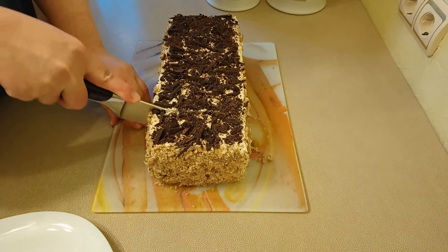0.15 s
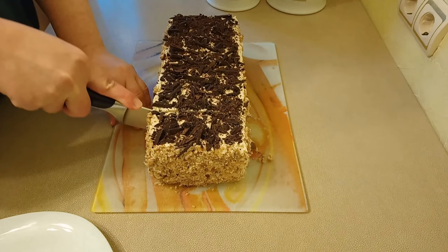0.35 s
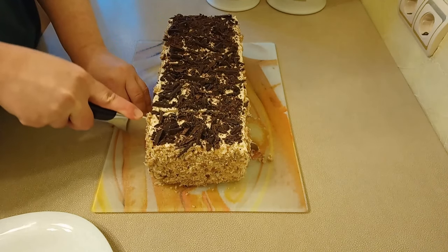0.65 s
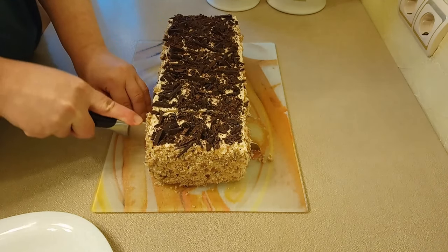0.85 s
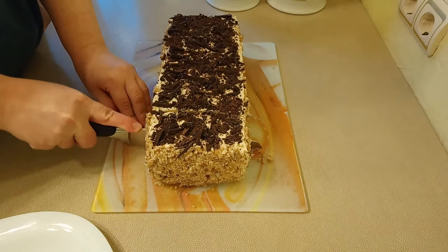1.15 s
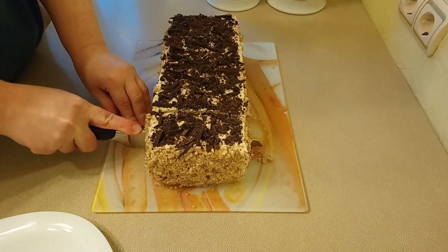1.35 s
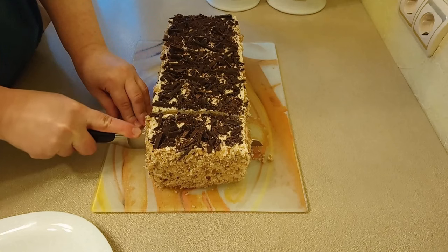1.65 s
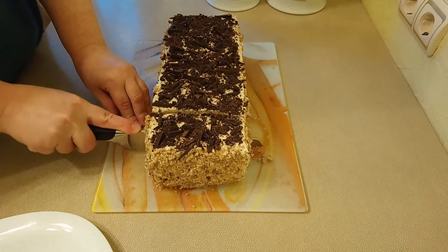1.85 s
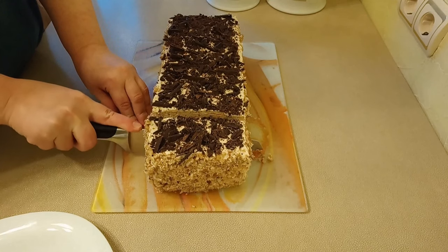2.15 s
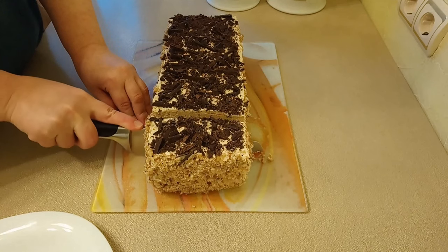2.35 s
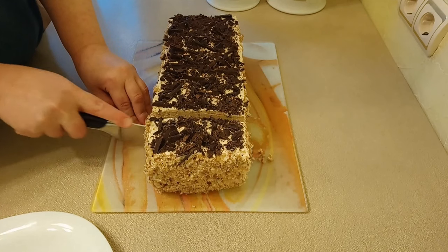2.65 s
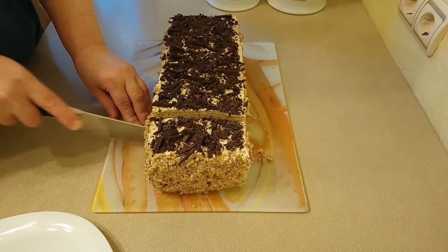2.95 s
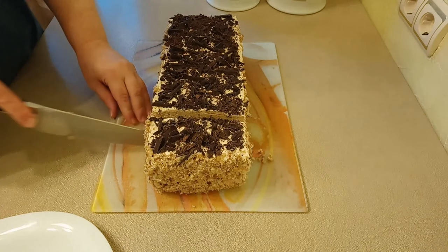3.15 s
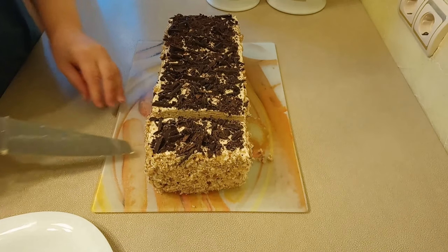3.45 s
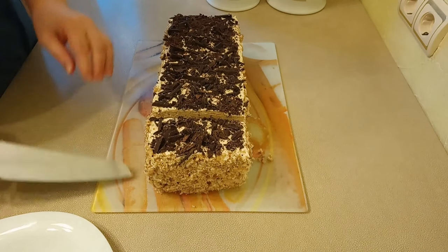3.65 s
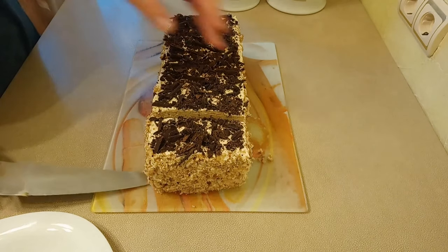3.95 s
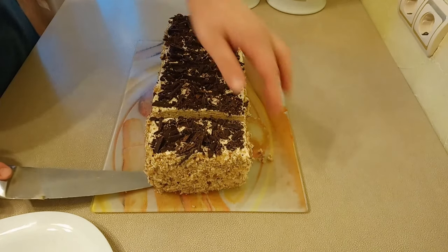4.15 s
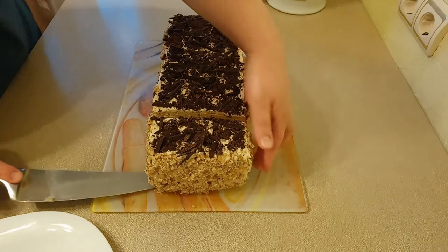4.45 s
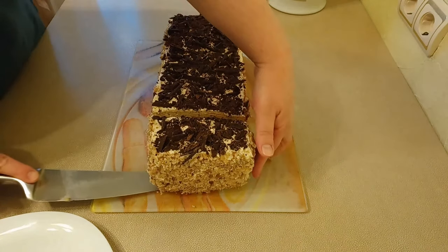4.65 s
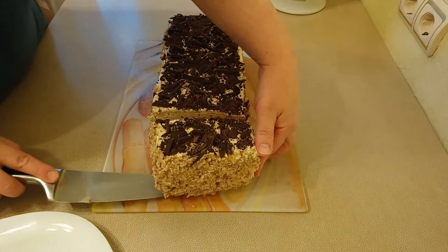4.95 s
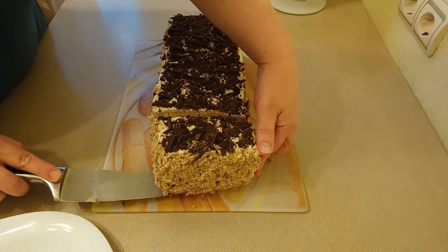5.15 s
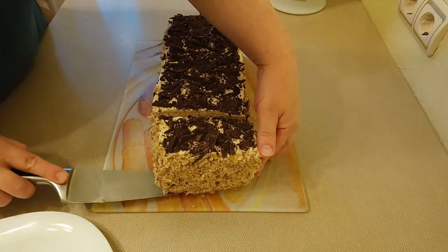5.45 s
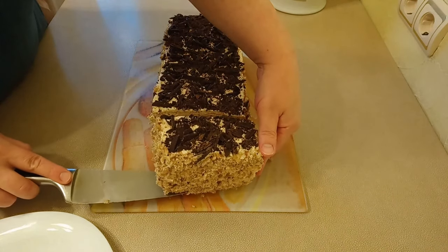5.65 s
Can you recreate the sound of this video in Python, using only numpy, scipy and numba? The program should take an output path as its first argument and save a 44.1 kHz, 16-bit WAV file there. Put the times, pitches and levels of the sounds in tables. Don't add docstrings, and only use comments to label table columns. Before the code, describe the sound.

Close phone pickup in a small hard kitchen, in stereo. Cake crust crackles and a knock sounds, then the knife hits glass and grinds in short gritty strokes, building to a longer rough draw. After a pause the blade tip taps and rings metallically with a brief squeal, knocks once sharply, then scrapes quietly under the slice. Low appliance hum and hiss remain.

```python
import sys
import numpy as np
from scipy import signal
from scipy.fft import rfft, irfft
from scipy.io import wavfile
from scipy.ndimage import uniform_filter1d
from numba import njit

SR = 44100
rng = np.random.default_rng(int(sys.argv[2]) if len(sys.argv) > 2 else 0)


def int16_out(signal):
    q = np.round(np.clip(np.atleast_2d(signal).T, -1, 1) * 32767)
    wavfile.write(sys.argv[1], SR, q.astype(np.int16))


def magnitude_from_level(level_db):
    exponent = np.asarray(level_db, float) / 20
    return 10 ** exponent


N = 255701
T = np.arange(N) / SR


def shape(x, table, scale=0.93):
    hz, db = np.transpose(table)
    bins = np.log(np.arange(x.shape[-1] // 2 + 1) * SR / x.shape[-1] + 1)
    return irfft(rfft(x) * magnitude_from_level(scale * np.interp(bins, np.log(hz), db)), x.shape[-1])


def unit(x):
    return x / np.sqrt(np.mean(x ** 2))


@njit
def resonate(x, hz, width):
    y, band, low = np.empty(len(x)), 0., 0.
    for i in range(len(x)):
        g, k = np.tan(np.pi * hz[i] / SR), width / hz[i]
        v = (band + g * (x[i] - low)) / (1 + g * (g + k))
        band, low, y[i] = 2 * v - band, low + 2 * g * v, k * v
    return y


def walk(rate_hz):
    k = int(SR / rate_hz)
    return 1.116 * uniform_filter1d(np.repeat(rng.standard_normal(N // k + 1), k), k)[:N]


# hz, density_db (per Hz)
AIR = [(12, -51.5), (20, -20.5), (146, -5.5), (187, -5.5), (216, -10.5), (241, -12), (357, -17.5),
       (485, -17.5), (1480, -24), (6360, -25), (7520, -38), (8650, -35.5), (12400, -39.5), (14700, -32),
       (16000, -21)]
# hz, common_share
AIR_LIKENESS = [(30, 0.43), (130, 0.76), (300, 0.24), (1000, 0.13), (3000, 0.033)]
AIR_DB = -69.5


def air():
    common, left, right = rng.standard_normal((3, N))
    likeness = [(hz, np.clip(share, .001, .999)) for hz, share in AIR_LIKENESS]
    shared = [(hz, 10 * np.log10(share)) for hz, share in likeness]
    own = [(hz, 10 * np.log10(1 - share)) for hz, share in likeness]
    hiss = shape(shape(common, shared) + shape(np.array([left, right]), own), AIR)
    return magnitude_from_level(AIR_DB) * hiss / np.std(shape(hiss, [(249, -80), (250, 0)]))


# start_s, hum_level_db
HUM = [(0.0, -97), (0.11, -83), (0.63, -68), (1.24, -86), (1.32, -72.5), (1.7, -79.5), (1.78, -68),
       (1.94, -75), (2.76, -54.5), (3.71, -71), (3.89, -55.5), (4.02, -65.5), (4.26, -53), (4.41, -90),
       (4.49, -66.5), (5.42, -80), (5.49, -66.5), (5.8, -72)]
# pitch_hz, width_hz, level_db, share_of_hum_swing, own_wander_db
HUM_MODES = [(130.7, 4.1, -9.5, .3, 6.5), (167.7, 11, -8, 0.53, 7.5), (194.6, 7.8, 0.5, 0.92, -2)]
HUM_MEAN_DB = -71.5


def hum():
    swing_db = np.interp(T, *np.transpose(HUM)) - HUM_MEAN_DB
    out = 0
    for hz, width, db, share, wander_db in HUM_MODES:
        centre = np.full(N, 1. * hz)
        mid, side = (unit(resonate(resonate(rng.standard_normal(N), centre, 1. * width), centre, 3.2 * width))
                     for _ in range(2))
        level = magnitude_from_level(HUM_MEAN_DB + db + share * swing_db + wander_db * walk(4.2))
        out = out + level * (mid + 0.17 * side * np.array([[1], [-1]]))
    return out


# pitch_hz, level_db, start_s, end_s
WHINE = [
    (5200, -89.5, 3.5, 6.9),
    (6066, -90.5, -0.5, 2.8),
    (6100, -87, 5, 5.35),
    (6480, -87.5, 1, 1.52),
    (6490, -86, 1.5, 6.15),
    (7390, -91.5, -1, 7.1),
]
WHINE_FADE_S = 0.42


def whine():
    out = 0
    for hz, db, start, end in WHINE:
        phase = 2 * np.pi * np.cumsum(hz + 1.2 * walk(7.8)) / SR + rng.uniform(0, 2 * np.pi, (2, 1))
        running = np.clip(np.minimum(T - start, end - T) / WHINE_FADE_S, 0, 1)
        out = out + running * magnitude_from_level(db + 7.5 + 3.4 * walk(8)) * np.sin(phase)
    return out


# hz, t60_s
ROOM = [(100, 0.2), (500, 0.33), (2000, 0.28), (6000, 0.21), (12000, 0.11)]


def kitchen(x):
    t, tail = T[:SR // 2], 0
    room_hz, room_t60 = np.transpose(ROOM)
    for hz in 90 * 2. ** np.arange(8):
        t60 = np.interp(np.log(hz), np.log(room_hz), room_t60)
        own = min(hz / 1300, 1) * rng.standard_normal((2, len(t)))
        common = max(1 - hz / 1300, 0) * rng.standard_normal(len(t))
        octave = [(hz / 2, -60), (hz / 2 ** .5, -3), (hz, 0), (hz * 2 ** .5, -3), (hz * 2, -60)]
        band = shape(unit(own + common), octave)
        tail = tail + band * np.exp(-np.log(1000) * t / t60) * np.clip(t / 0.0079, 0, 1)
    fine, broad = (uniform_filter1d(np.abs(rfft(tail)), size=k) for k in (7, 300))
    tail = irfft(rfft(tail) * broad / fine)[:, :SR * 2 // 5]
    return signal.fftconvolve(x[1:], tail / np.sqrt(np.sum(tail ** 2) / 2), axes=1)[:, :N]


# hz, level_db
ECHO_FEED = [(700, 0.5), (900, -5.5), (1050, -12.5), (1250, -5.5), (1600, 0.5)]
# hz, level_db
ECHO_SHADE = [(5500, 1), (7000, -5), (8000, -18.5), (10000, -13.5), (14000, -12)]


def echo(knife):
    left, right = kitchen(shape(knife, ECHO_FEED))
    return magnitude_from_level(-6.0) * np.array([shape(left, ECHO_SHADE), right])


def grit(scatter_db, patchy_db, patch_hz):
    grains = rng.standard_normal(N) * magnitude_from_level(scatter_db * rng.exponential(size=N))
    return unit(grains * magnitude_from_level(patchy_db * walk(patch_hz)))


RISE_DB_S, FALL_DB_S = 1202, 332


def push(rows, rise=RISE_DB_S, fall=FALL_DB_S, depth=40):
    return [[(s - depth / rise, db - depth, *tone),
             (s, db, *tone),
             (s + abs(hold) + 1e-4, db, *tone),
             (s + abs(hold) + depth / fall, db - depth, *tone)] for s, hold, db, *tone in rows]


def catches(rows):
    return [(*row, 0.0042) for row in rows]


LEFT_LAG = 11


def small_modes(dense):
    swarm = rng.standard_normal((2, 900)) + 0.12 * rng.standard_normal(900)
    swarm = swarm * np.exp(-T[:900] / 0.0028)
    swarm[:, 0] = 3.5
    swarm = irfft(rfft(swarm) / uniform_filter1d(np.abs(rfft(swarm)), size=9))
    swarm[0] = np.roll(swarm[0], LEFT_LAG)
    swarm = swarm / np.sqrt(np.sum(swarm ** 2) / 2)
    return signal.fftconvolve(dense[1:], swarm, axes=1)[:, :dense.shape[1]]


def contact(strokes, slips, modes, grains, slip_db, stretch=None, knock=3.2, drift=0.):
    drive, tilt = np.zeros(N), np.zeros(N)
    for s, db, *bright in map(np.transpose, strokes):
        now = (T >= s[0]) & (T < s[-1])
        gain = magnitude_from_level(np.interp(T[now], s, db))
        drive[now] += gain
        tilt[now] += gain * sum(b[0] for b in bright)
    force = drive * grains
    chatter = rng.choice([-1., 1.], N)
    for s, db, bright, burst in slips:
        at = int(s * SR)
        blow = magnitude_from_level(db + slip_db) * np.exp(-T[:3000] / max(burst, .0005))
        force[at:at + 3000] += blow * chatter[at:at + 3000]
        force[at] += knock * blow[0]
        drive[at:at + 3000] += blow
        tilt[at:at + 3000] += blow * bright
        drive[at], tilt[at] = blow[0], blow[0] * bright
    on = uniform_filter1d(1. * (drive > 0), 8820, origin=4000) > 0
    force = force[on]
    tilt = np.clip(tilt / (drive + 1e-9), -14, 14)[on]

    total = np.sqrt(sum(magnitude_from_level(2 * db) * np.pi * width / SR for _, width, db in modes))
    glide = np.interp(T[on], *np.transpose(stretch)) if stretch else np.ones(len(force))
    wobble = drift * walk(24.96)[:len(force)]
    clear, dense = np.zeros((2, 2, len(force)))
    for k, (hz, width, db) in enumerate(modes):
        coloured = force * magnitude_from_level(tilt * np.log2(max(hz, 1000) / 1500)) + 1e-18
        centre = hz * glide * (1 + np.roll(wobble, 1500 * k))
        ring = resonate(coloured, centre, max(width, 3.))
        lag = int(min(LEFT_LAG, .2 * SR / hz))
        bus = dense if width > 400 else clear
        bus += (-1) ** k * magnitude_from_level(db) * np.array([np.roll(ring, lag), ring]) / total
    out = np.zeros((2, N))
    out[:, on] = clear + small_modes(dense)
    return out


def spots(strokes, slips, modes, grains, slip_db, **how):
    out = 0
    for k in range(len(strokes)):
        here = [(mode[0], mode[1], mode[2 + k]) for mode in modes]
        out = out + contact(strokes[k], slips[k], here, grains, slip_db, **how)
    return out


# start_s, hold_s, level_db
LEAN = [
    (0.07, 0.037, -69.5),
    (.45, 0.073, -73.5),
    (.92, 0.035, -64.5),
    (2.07, 0.037, -70.5),
    (2.43, 0.057, -65),
    (3.3, 0.17, -70.5),
    (3.85, 0.11, -68),
]
# pitch_hz, width_hz, level_db
CABINET = [(88, 18, -6), (125.3, 22, 5.5)]


def leaning_hand():
    return contact(push(LEAN, 350, 250), [], CABINET, grit(1.5, 2.2, 27), 0)


# start_s, hold_s, level_db
THUD = [
    (0.05, 0.017, -81),
    (0.69, 0.062, -66),
    (1.786, 0.0015, -43),
    (2.04, .03, -69),
    (2.63, 0.476, -54),
    (3.78, 0.19, -74.5),
]
# pitch_hz, width_hz, level_db
WORKTOP = [(60, 80, -11.5), (131, 45, -0.5), (211.3, 45, 3), (268, 28, 3), (353, 35, -8.5)]


def worktop_thuds():
    return contact(push(THUD, 300, 500), [], WORKTOP, grit(0.92, 1.4, 40), 0) * magnitude_from_level(-3.0)


# start_s, peak_db, brightness_db_per_octave, burst_s
NUDGE = [
    (5.428, -52.5, -0.5, 0.022),
]
# pitch_hz, width_hz, level_db
NUDGED = [(776, 27, -1.5), (1244, 23, -1), (1726, 18, 4), (2950, 43, -10), (3560, 37, 1), (4863, 32, 0.5),
          (7320, 75, 1), (3000, 2600, -18), (2450, 68, -8)]


def nudge(grains):
    return contact([], NUDGE, NUDGED, grains, -5.0)


WEDGE_S, WEDGE_DB_S = 4.172, 56
WEDGE_BENDING_DB, WEDGE_PRESSED_DB = -55, -61


def wedge(db, *tone):
    return push([(WEDGE_S, 0, db, *tone)], WEDGE_DB_S, 3000, 20.1)


# start_s, hold_s, level_db, brightness_db_per_octave
UNDER = [
    (4.7, 0.037, -76, 9.5),
    (4.85, 0.0086, -60.5, 1.5),
    (5.0, 0.035, -73.5, -6.5),
]
# start_s, peak_db, brightness_db_per_octave
UNDER_SLIPS = [(4.655, -50, 1), (4.754, -68, 4), (4.799, -62, -14), (4.678, -49, -6), (4.776, -62, -2),
               (4.834, -43, 7.5), (4.849, -52, -15), (4.867, -44, 2), (4.879, -46, 1.5), (4.919, -40, 0),
               (4.934, -42.5, -2), (4.976, -50, 2), (5.011, -51, 5), (5.021, -44.5, -5), (5.071, -49, -11)]
# pitch_hz, width_hz, level_db
PRESSED = [(800, 45, -7.5), (998, 23, -4), (1325, 55, 5), (1387, 148, -1.5), (2495, 71, -3),
           (2800, 66, -7.5), (3020, 58, -8), (3640, 52, -6.5), (4300, 120, -8.5), (4750, 43, -34),
           (5340, 110, -14), (6500, 59, -15), (7660, 89, -7.5), (9320, 72, -1.5), (1480, 4500, -18),
           (4150, 12500, -16)]


def under_the_slice():
    strokes = push(UNDER, 52.4, 87, 25) + wedge(WEDGE_PRESSED_DB, 3.1)
    return contact(strokes, catches(UNDER_SLIPS), PRESSED, grit(2.25, 2.2, 60), -5.0, knock=2.7, drift=0.0081)


# start_s, hold_s, level_db
SQUEAL = [
    (3.842, 0.062, -45.5),
]
SQUEAL_HZ = 1221


def squeal():
    s, db = np.transpose(push(SQUEAL, 530, 266)[0])
    phase = 2 * np.pi * np.cumsum(SQUEAL_HZ + 3.4 * walk(60)) / SR
    level = magnitude_from_level(np.interp(T, s, db, -150, -150) + 3.5 + 2.1 * walk(83))
    return level * np.sin(phase - np.array([[1.1], [0]]))


# start_s, hold_s, level_db
SKATE = [
    (3.76, .002, -55),
    (3.845, 0.013, -56),
    (3.93, 0.22, -71.5),
]
# start_s, pitch_factor
SKATE_STRETCH = [(3.75, 0.96), (3.9, 0.99), (4.0, 1.02), (4.1, 1.075), (4.201, 1.06)]
# start_s, peak_db, brightness_db_per_octave, burst_s
SKATE_SLIPS = [
    (3.754, -29.5, 1, 0.0079),
    (3.766, -40.5, 5, 0.019),
    (3.799, -30.5, -2.5, 0.0092),
    (3.809, -28.5, 0, 0.015),
    (3.842, -40, 0.5, 0.044),
]
# pitch_hz, width_hz, level_db
BENDING = [(400.5, 15, -9), (765.5, 14, 1.5), (1134, 24, -9), (1683, 15, -3), (2330, 38, -16),
           (3910, 30, -14), (2820, 31, -16)]
GRIP_DB_S = 500


def skating_tip(grains):
    strokes = push(SKATE, 850, 133, 20) + wedge(WEDGE_BENDING_DB)
    grip_db = GRIP_DB_S * np.clip(T - WEDGE_S - .012, 0, .1)
    return contact(strokes, SKATE_SLIPS, BENDING, grains, -15.5, SKATE_STRETCH) * magnitude_from_level(-5.5 - grip_db)


# pitch_hz, width_hz, level_db
BLADE = [(704, 65, -5.5), (1216, 45, -3.5), (2860, 60, -4), (2473, 47, -6), (3010, 24, -14),
         (3520, 36, -1.5), (4300, 38, -3.5), (3920, 22, -1.5), (4660, 59, -9), (5150, 49, -13),
         (5500, 31, -0.5), (6490, 70, -3.5), (7600, 43, -11), (8760, 36, 2.5), (9500, 32, 2.5),
         (10800, 45, -8), (11640, 42, 5), (13000, 120, -14), (810, 760, -31), (2530, 5500, -15),
         (5150, 3500, -14.5), (10030, 9200, -9)]


def tapped_blade(grains):
    return contact([], SKATE_SLIPS, BLADE, grains, -1.8)


# start_s, hold_s, level_db, brightness_db_per_octave
CRUMB = [
    [(0.001, 0.02, -65.5, 8), (0.05, 0.0028, -47, 3)],
    [(.38, .07, -68, -5), (0.686, 0.0036, -44.5, 1.5), (0.8, 0.12, -57, 2), (1.0, 0.056, -63.5, 1.5)],
    [(4.176, 0.0018, -46, -5.5)],
    [(0.588, 0.06, -45.5, 0.5)],
]
# start_s, peak_db, brightness_db_per_octave, burst_s
CRACKS = [
    [(0.05, -38.5, 6.5, 0.0042)],
    [(.686, -26.5, 3, 0.0027), (.697, -31.5, -7, 0.0048), (.717, -44, -6, 0.0034), (.743, -47, -2, .004),
     (.8215, -57, -4, .003), (1.021, -52, -2, 0.0026)],
    [(4.183, -25, 1, 0.0009), (4.194, -50, -18, 0.0087)],
    [(0.589, -40, 5.5, 0.0089)],
]
# pitch_hz, width_hz, crust_db, first_knock_db, last_knock_db, sponge_db
CRUST = [(439, 43, -16.5, -7.5, -4, -24), (587, 32, 6, 1, -10, -20), (877, 160, -1.5, -27, 1, -18),
         (1270, 395, -18, 2, -3.5, -10), (1760, 360, -7, 2, -29, -3), (2330, 180, -28, -1.5, -11.5, -2.5),
         (3330, 160, -6, -3, -19, -9), (4820, 260, -30, -5.5, -10.5, -19), (1480, 1010, -9, -4, -7.5, -3.5),
         (3100, 6200, -6, -9.5, -9.5, -5.5), (5620, 2970, 0.5, -8, -11, -2.5),
         (9500, 3600, -0.5, -41, -28, -5), (15200, 1500, -9, -28.5, -28, -6),
         (1520, 126, -20, -1, -18, -11)]


def crumbs_and_knocks():
    strokes = [push(crumb, 5000, 225) for crumb in CRUMB]
    return spots(strokes, CRACKS, CRUST, grit(3.1, 3.7, 80), -0.62, drift=0.031) * magnitude_from_level(-5.5)


# pitch_hz, width_hz, then level_db at three spots
BOARD_MODES = [(341, 11, -20.5, -32, -18), (454, 17, -6.5, -25, -19), (578, 17, -3.5, -4.5, -8),
               (653, 88, -3.5, -2.5, -6.5), (762, 147, -6.5, -5, -10.5), (941, 54, 1, -2, -6),
               (996, 45.4, 7, 5, 7), (1102, 54, 2.5, 4, 1), (1200, 65, -12, -17.5, -7),
               (1276, 24, -21, -15.5, -6), (1406, 128, -16.5, -6.5, -5.5), (1561, 23, -8.5, -4.5, -3),
               (1780, 110, -31, -26, -18), (2353, 71, -19, -17.5, -12),
               (2870, 370, -33, -27, -15), (3212, 102, -14, -12.5, -11.5), (3270, 56, -16, -20, -27.5),
        (3790, 140, -16, -25.5, -27.5), (4260, 78, -31, -22.5, -18), (4775, 110, -21, -23.5, -18.5),
        (5630, 310, -23, -29, -26), (6490, 390, -26, -29.5, -37), (7700, 81, -41, -31.5, -33),
        (9690, 310, -22, -42, -31.5)]
# pitch_hz, width_hz, then level_db at three spots
CROWDS = [(612, 370, -11.5, -26.5, -34.5), (1310, 1570, -29.5, -16, -13), (2154, 630, -17.5, -29, -22.5),
          (3204, 820, -24, -35.5, -38.5), (5450, 4000, -24.5, -35.5, -25.5)]
DRAGGED = [-20, -22.5, -7.5, -10, -13, -4.5, 7, -4.5, -8.5, -4.5, -0.5, -6.5, -14, -18, -25.5, -7.5, -20,
           -30.5, -10.5, -15, -23, -34.5, -32.5, -24, -30.5, -11, -26.5, -30.5, -28.5]
LEAVING = [-26, -23.5, -10.5, -12.5, -10, -2.5, 5.5, 2, -6.5, -6.5, -2, -0.5, -11.5, -11, -23, -19, -31,
           -34, -5, -8.5, -24, -33, -20.5, -20, -24, -13.5, -28.5, -42, -25]
# pitch_hz, width_hz, then level_db at five spots
BETWEEN = [(825, 54, -6, -4.5, -12, -23.5, -10.5), (1703, 22, -16, -18, -10, -9.5, -13.5),
           (1993, 31, -18, -18.5, -10.5, -13.5, -19.5), (2660, 40, -26.5, -25, -11.5, -19, -18.5)]


def board():
    main = BOARD_MODES + CROWDS
    return [(*mode, dragged, leaving) for mode, dragged, leaving in zip(main, DRAGGED, LEAVING)] + BETWEEN


# start_s, hold_s, level_db, brightness_db_per_octave
CUT = [
    [(.5, 0.095, -71.5, 4), (0.592, 0.065, -56, -1), (1.69, .015, -61.5, -2), (1.718, 0.015, -38, 0),
     (1.78, 0.0015, -34.5, 8.5), (1.88, 0.19, -54.5, 0.5)],
    [(2.038, 0.043, -36.5, -4.5), (2.1, 0.054, -43, -2.5), (2.19, 0.049, -53.5, 2),
     (2.296, 0.026, -48.5, -2)],
    [(2.522, 0.011, -54.5, -8.5), (2.545, .03, -46, 0.5), (2.59, .07, -34.5, -0.5),
     (2.69, 0.084, -36, -0.5)],
    [(2.81, 0.13, -35.5, -0.5), (2.97, 0.026, -40, 5.5)],
    [(3.04, 0.041, -41, 4), (3.11, 0.0076, -49, 5.5)],
]
# start_s, peak_db, brightness_db_per_octave
CUT_SLIPS = [
    [(0.589, -49, 4), (1.697, -49, -0.5), (1.709, -38.5, 3), (1.714, -28.5, -6), (1.719, -29.5, 3),
     (1.725, -32.5, 2), (1.736, -46, 4), (1.776, -17.5, 1), (1.786, -24, -2), (1.795, -24, -3.5),
     (1.802, -23.5, 2.5), (1.815, -32, -1), (1.823, -39, -3), (1.836, -40, -4), (1.86, -45, -2)],
    [(1.998, -46.5, 3), (2.028, -33, -3), (2.035, -25, 1), (2.043, -31.5, -1.5), (2.055, -30, -1.5),
     (2.06, -24.5, -1.5), (2.077, -30.5, -0.5), (2.106, -27, -9), (2.119, -28, 6), (2.124, -27, -5),
     (2.133, -35, -6), (2.145, -44, -7.5), (2.163, -51, 2.5), (2.293, -46, -12.5), (2.301, -42.5, -12),
     (2.308, -41, -4.5)],
]
# start_s, peak_db, brightness_db_per_octave
DRAW_SLIPS = [
    [(2.53, -37.5, -13), (2.551, -42, 7.5), (2.565, -33, 2.5), (2.581, -28.5, -17.5), (2.589, -31, -13),
     (2.603, -27.5, -20), (2.613, -20, -8), (2.634, -24, -7), (2.65, -25.5, 1.5), (2.661, -23, -0.5),
     (2.672, -22.5, -3.5), (2.69, -25.5, -7.5), (2.701, -29, -1.5), (2.708, -19.5, -2.5),
     (2.714, -25.5, -2), (2.726, -22, 0.5), (2.735, -23, 1.5), (2.742, -20, -3), (2.753, -23, 0),
     (2.769, -27, 1), (2.78, -25, -1.5), (2.787, -30, 2), (2.798, -28.5, 4)],
    [(2.814, -24.5, -2), (2.828, -23.5, 1.5), (2.837, -30, -3), (2.842, -23, 1.5), (2.848, -28.5, -4),
     (2.861, -27, 2), (2.87, -22, -4.5), (2.885, -25.5, 6.5), (2.894, -20.5, 0), (2.903, -25.5, -8),
     (2.917, -25.5, 9), (2.926, -26.5, -6.5), (2.938, -24, 3), (2.95, -26, 2), (2.961, -25.5, 7.5),
     (2.972, -29, 5), (2.983, -37.5, 3), (3.006, -35, 0)],
    [(3.027, -24.5, 1), (3.037, -28.5, -2), (3.043, -26, 5.5), (3.054, -24, -3), (3.066, -21, 4.5),
     (3.078, -23.5, -8), (3.087, -25, -1.5), (3.095, -28, 4), (3.107, -31, -6), (3.123, -39, 5),
     (3.136, -41, 1.5)],
]


def cutting():
    strokes = [push(cut) for cut in CUT]
    slips = [catches(rows) for rows in CUT_SLIPS + DRAW_SLIPS]
    return spots(strokes, slips, board(), grit(2.77, 2.0, 90), -4, knock=10.2, drift=.006) * magnitude_from_level(-3.5)


# hz, level_db
SHADE = [(4000, -2), (8000, -14), (12000, -22), (15000, 0)]
# hz, level_db
CAPSULE = [(5000, 2), (7000, -5.5), (9000, -21), (12000, -27), (14800, -17), (15500, -12.5)]


def scene():
    knife = cutting() + worktop_thuds()
    skate = grit(3.36, 1.4, 120)
    knife += skating_tip(skate)
    knife += leaning_hand()
    knife += tapped_blade(skate)
    knife += under_the_slice()
    knife += nudge(skate)
    knife += crumbs_and_knocks()
    knife = shape(np.array([shape(knife[0], SHADE), knife[1]]), CAPSULE)
    return knife + echo(knife) + squeal() + (hum() + whine()) + air()


def band_limit(x):
    return signal.sosfilt(signal.butter(12, 16340, fs=SR, output="sos"), x)


# hz, left_minus_right_db
PORTS = [(60, -6.5), (200, -1.5), (500, -2), (1000, -2.5), (2000, -3), (4400, -1), (6500, -10.5),
         (8500, -5.5), (11000, -5.5), (15000, -4)]
# hz, level_db
TOP = [(15600, 0), (15700, -80)]


def record(dry):
    ports = np.array([shape(dry[0], PORTS, 0.24), shape(dry[1], PORTS, -0.49)])
    return band_limit(shape(ports, TOP))


dry = scene()
out = record(dry)
int16_out(out)
```